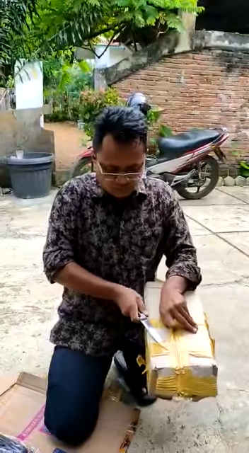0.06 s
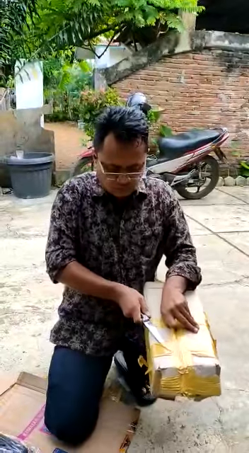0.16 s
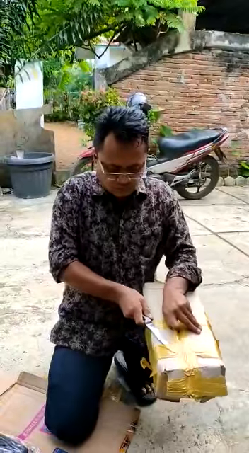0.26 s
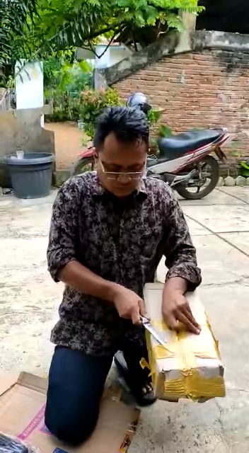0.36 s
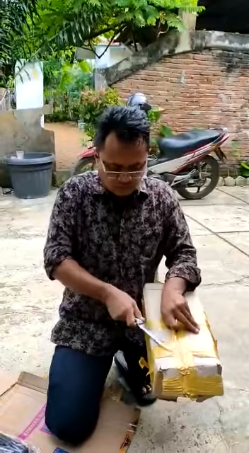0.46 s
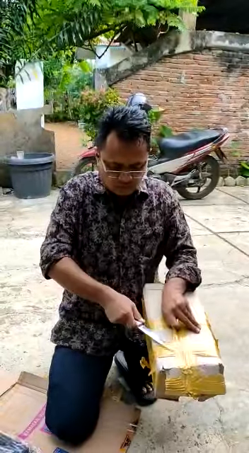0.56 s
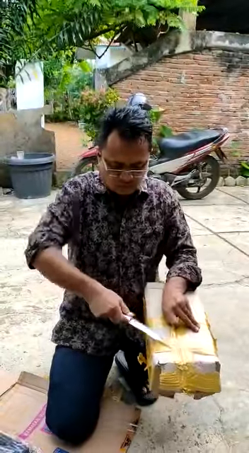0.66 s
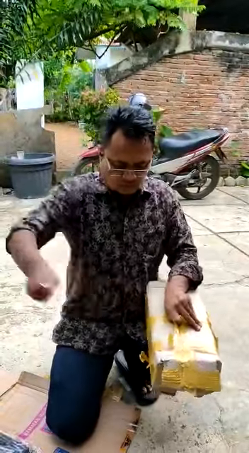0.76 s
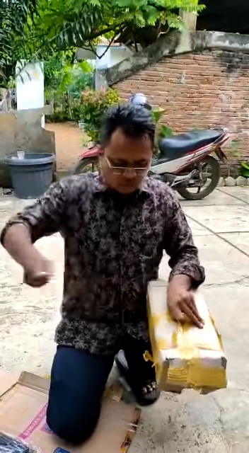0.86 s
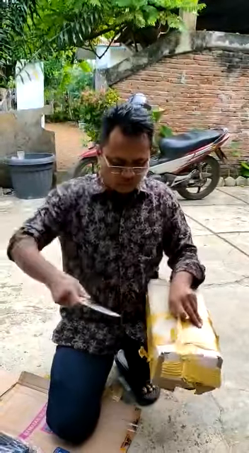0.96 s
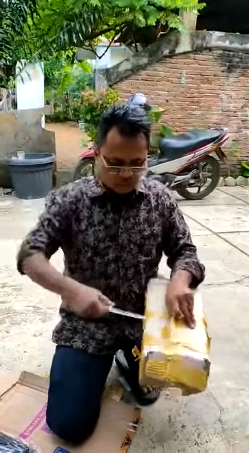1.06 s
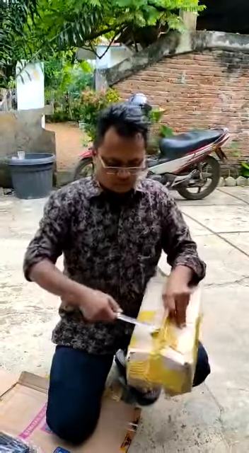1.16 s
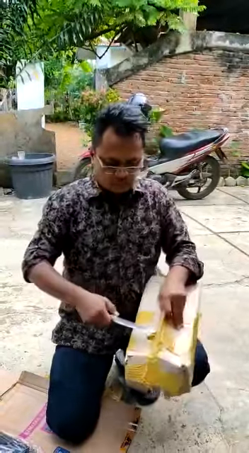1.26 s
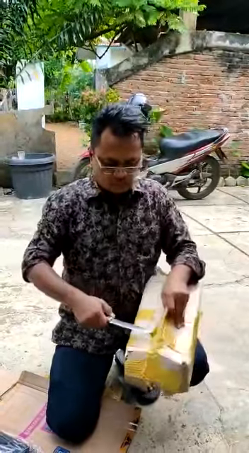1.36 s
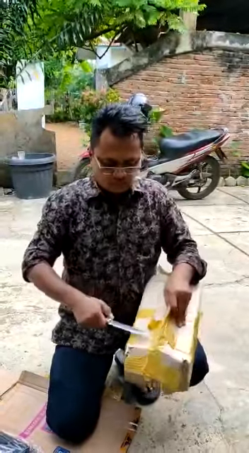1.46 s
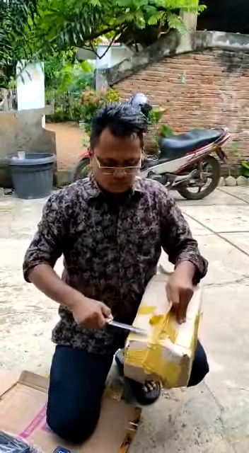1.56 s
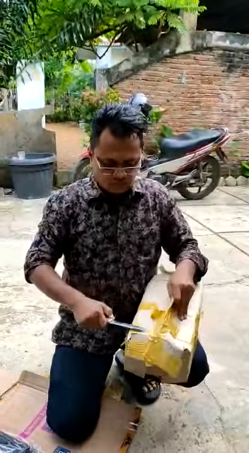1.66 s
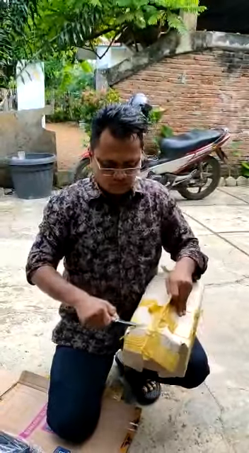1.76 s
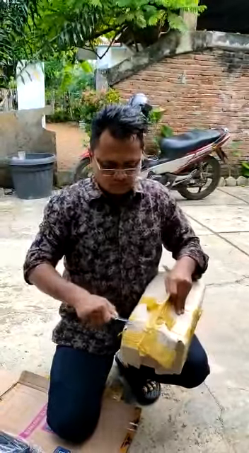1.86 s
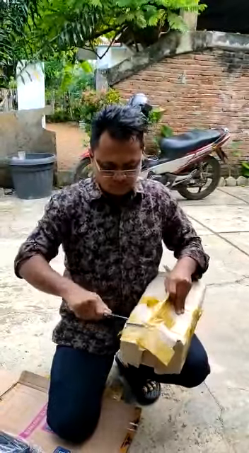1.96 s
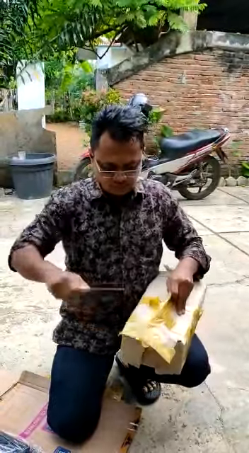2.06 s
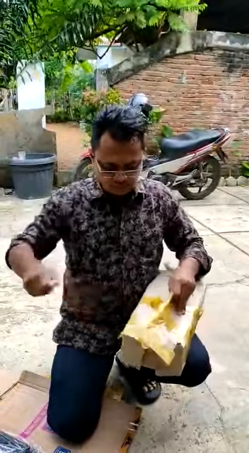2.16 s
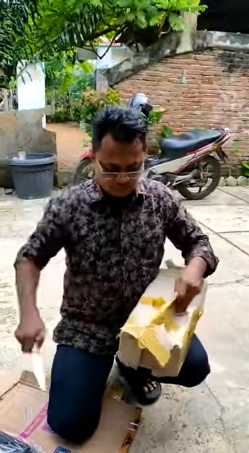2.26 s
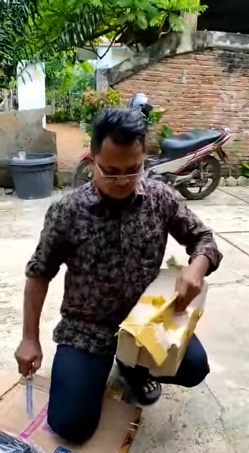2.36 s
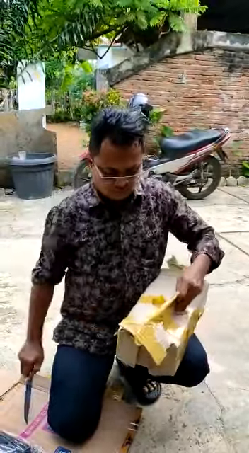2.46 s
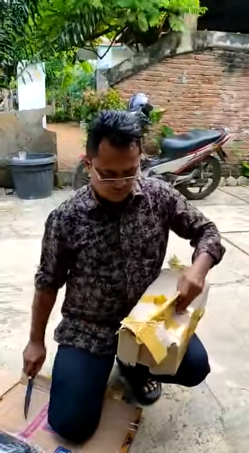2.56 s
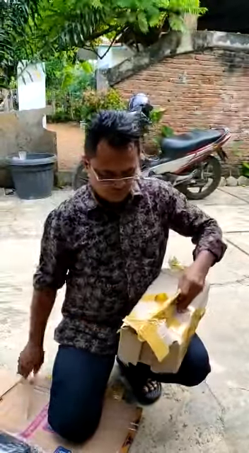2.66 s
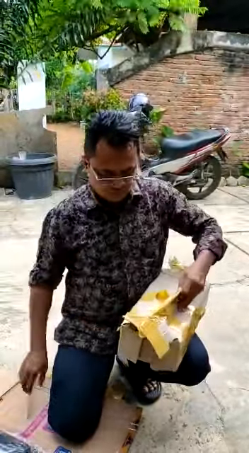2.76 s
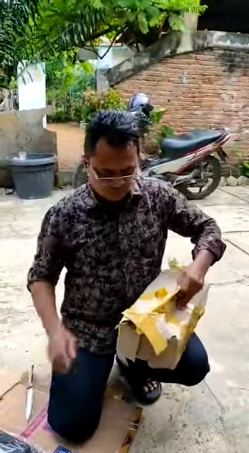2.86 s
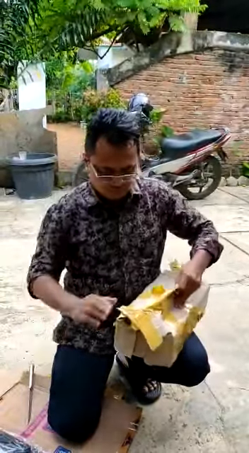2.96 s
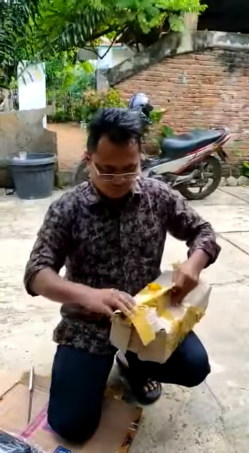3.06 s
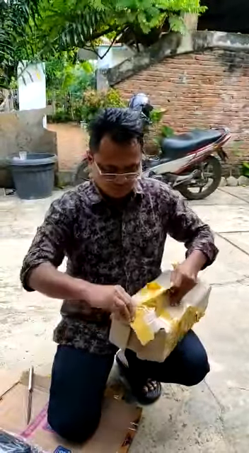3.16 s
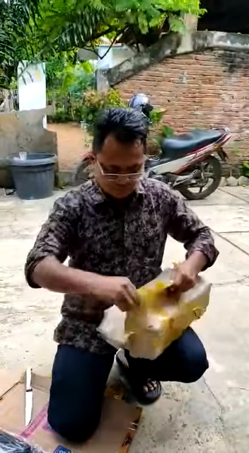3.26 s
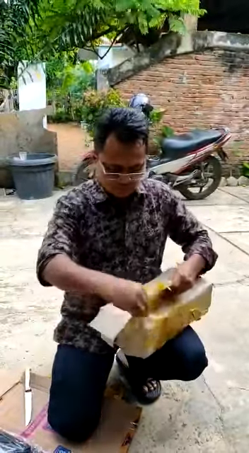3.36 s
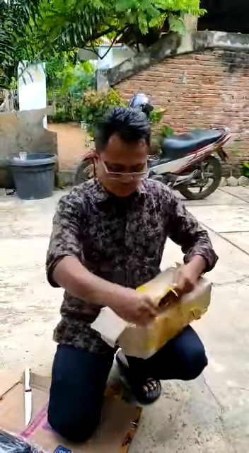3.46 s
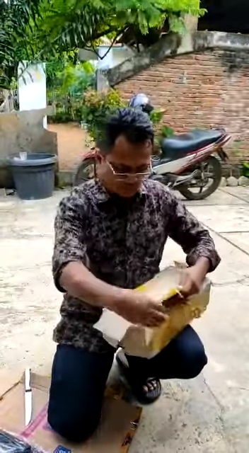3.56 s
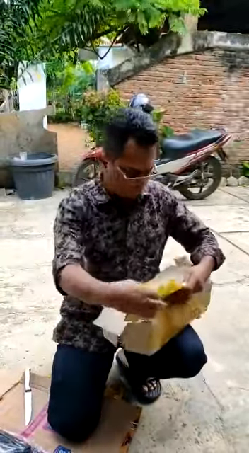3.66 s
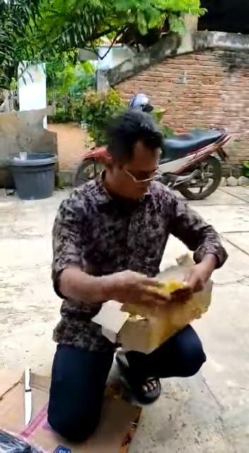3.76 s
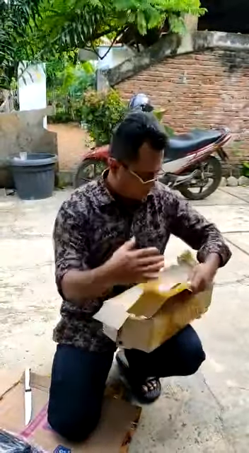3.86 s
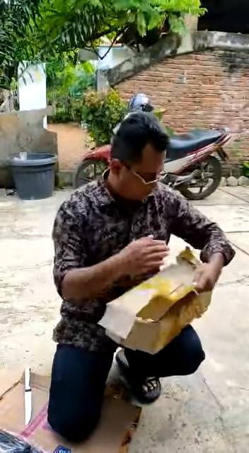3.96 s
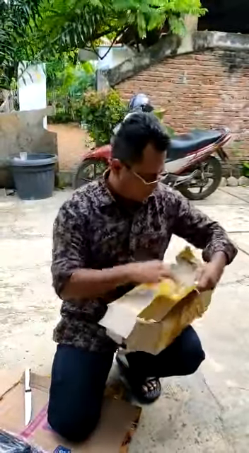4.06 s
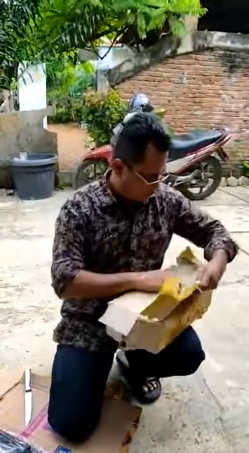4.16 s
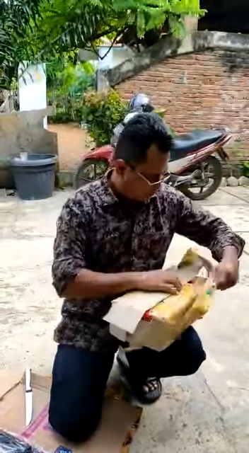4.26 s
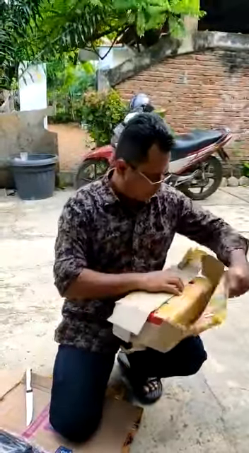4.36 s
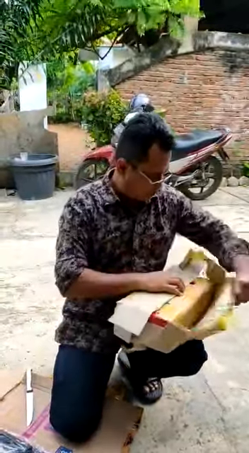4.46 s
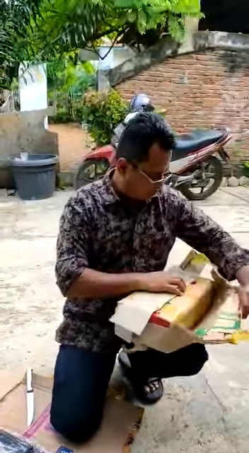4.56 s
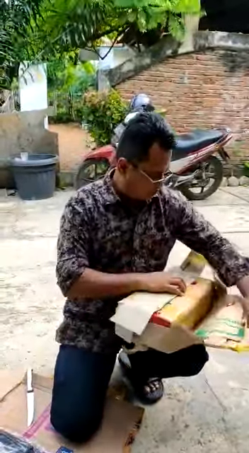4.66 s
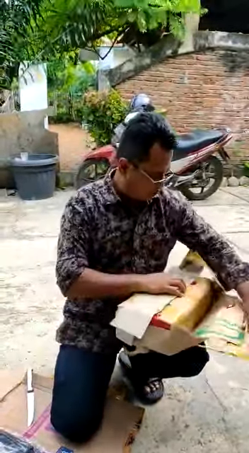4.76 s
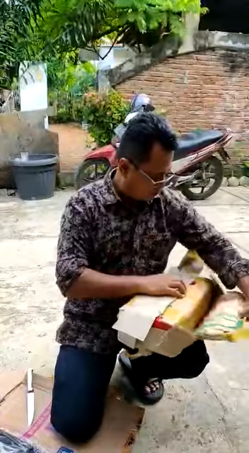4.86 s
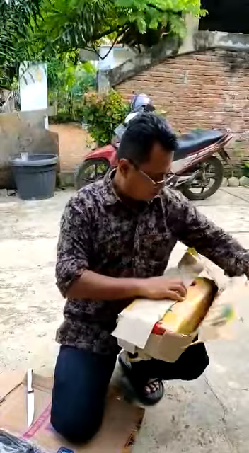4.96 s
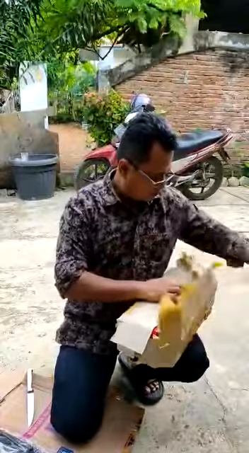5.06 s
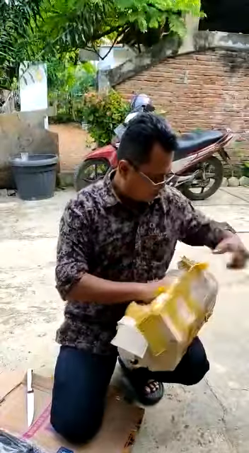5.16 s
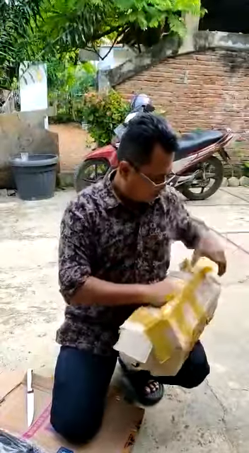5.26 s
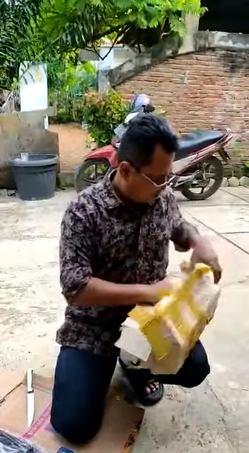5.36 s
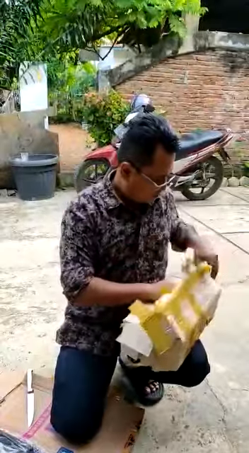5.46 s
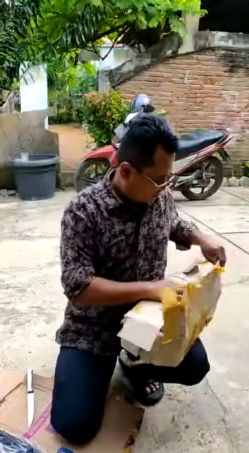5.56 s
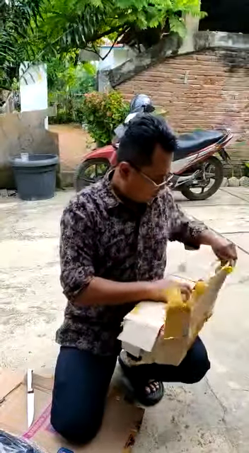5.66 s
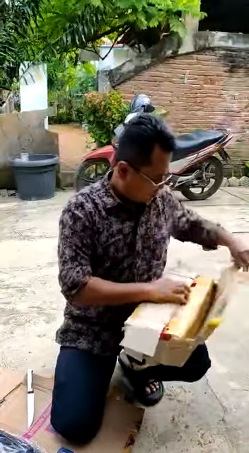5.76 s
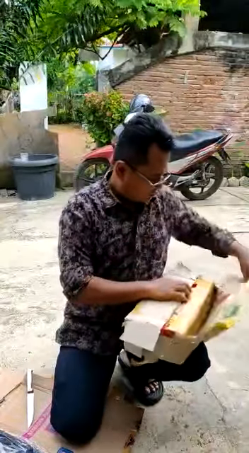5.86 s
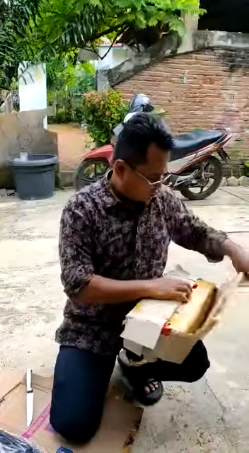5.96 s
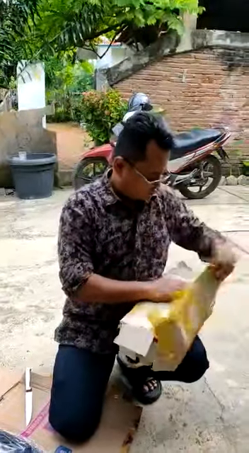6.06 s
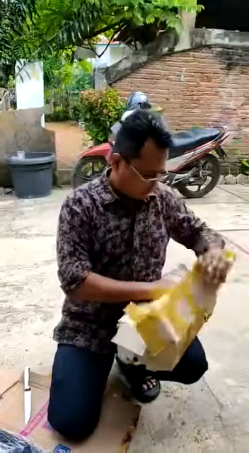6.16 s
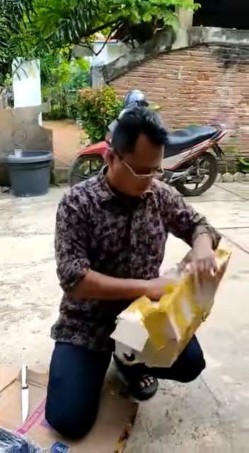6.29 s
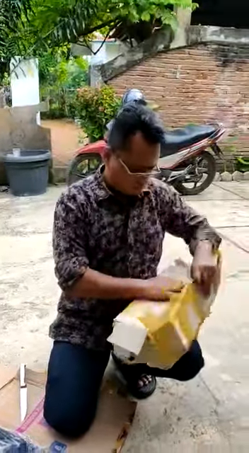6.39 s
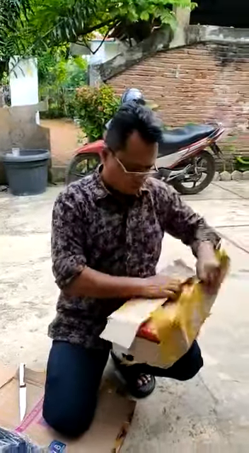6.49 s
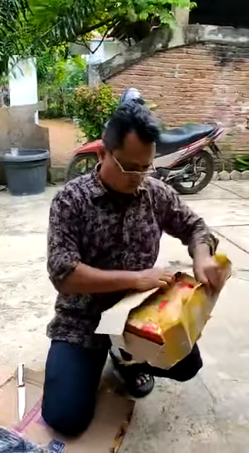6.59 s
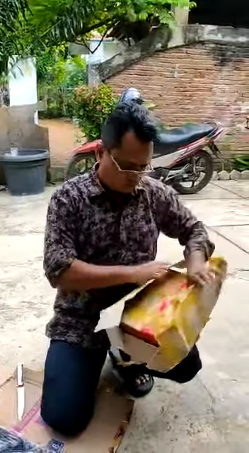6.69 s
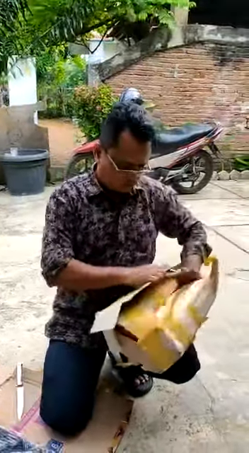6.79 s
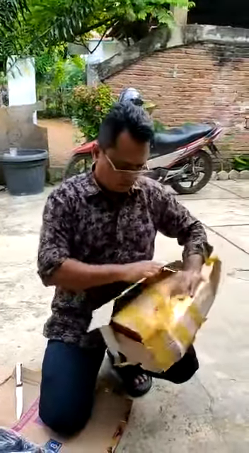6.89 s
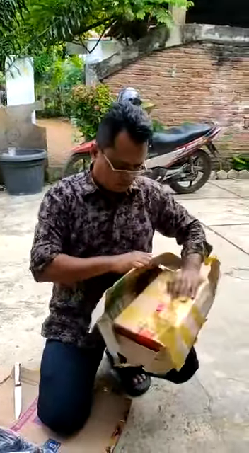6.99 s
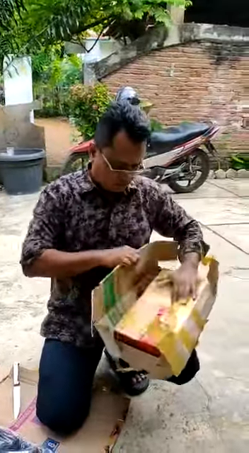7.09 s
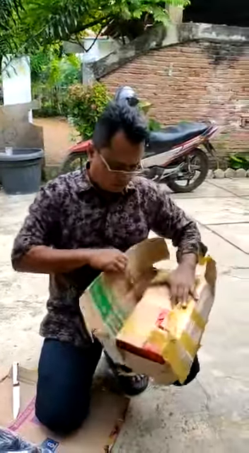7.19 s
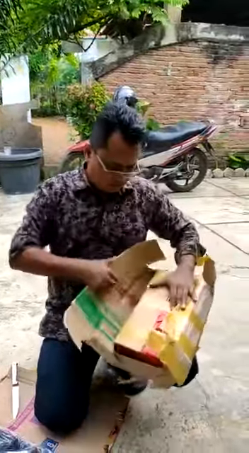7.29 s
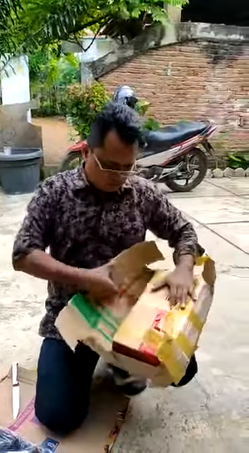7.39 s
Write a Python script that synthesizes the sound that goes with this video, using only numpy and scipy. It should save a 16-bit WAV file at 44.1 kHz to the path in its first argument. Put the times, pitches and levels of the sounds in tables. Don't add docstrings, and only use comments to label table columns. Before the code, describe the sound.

A knife snaps through parcel tape with sharp hollow cracks, then hands tug, rub and crinkle stiff cardboard open in a quiet walled yard.

```python
import sys
import numpy as np
from scipy import signal
from scipy.fft import rfft, irfft, next_fast_len
from scipy.io import wavfile
from scipy.ndimage import uniform_filter1d

SR = 44100
rng = np.random.default_rng(int(sys.argv[2]) if len(sys.argv) > 2 else 0)


def boost_factor(decibels):
    exponent = np.asarray(decibels, float) / 20
    return 10 ** exponent


def generate_wav(signal):
    frames = np.transpose(np.atleast_2d(signal))
    scaled = np.clip(frames, -1, 1) * 32767
    pcm = np.round(scaled).astype(np.int16)
    wavfile.write(sys.argv[1], SR, pcm)


N = 327516
M = next_fast_len(N + SR // 10, True)

# pitch_hz, level_db
AIR_COLOUR = [(12, -34.5), (20, -2), (113, -0.5), (738, -18.5), (1150, -36.5), (1570, -27), (2140, -20),
              (2670, -33.5), (6720, -12), (16000, -7)]
AIR_DB = -62.5
# pitch_hz, level_db
TRAFFIC_COLOUR = [(12, -27.5), (30, -20), (60, -14), (82, 2.5), (97, -11.5), (113, 0), (135, -12.5),
                  (180, -16.5), (230, -29.5), (400, -120)]
# time_s, level_db
ROAD = [
    (0.0, -95.5),
    (2.4, -84.5),
    (2.6, -68.5),
    (3.1, -77),
    (4.2, -83),
    (5.2, -71.5),
    (5.6, -54.5),
    (7.16, -63.5),
    (7.43, -65),
]
# time_s, level_db
JOLTS = [
    (.71, -54),
    (1.17, -69),
    (2.05, -59.5),
    (2.54, -63.5),
    (3.269, -66),
    (4.33, -52.5),
    (4.932, -52),
    (5.229, -56.5),
]
JOLT_RISE_DB_S, JOLT_FALL_DB_S = 291, 114.5

# pitch_hz, time to die by 60 dB_s, level_db
YARD_TAIL = [(184, 0.3, 8), (499, 0.27, 5.5), (1086.5, 0.32, -1), (2500, 0.37, 0), (4400, .34, -1),
             (7370, 0.31, 1), (11500, 0.27, -6)]
# delay_s, level_db
WALL_ECHOES = [
    (.0055, -2),
    (.014, -13),
    (0.022, -18.5),
    (.042, -16),
]

# pitch_hz, level_db per Hz
PLASTIC = [(1940, -39), (3300, -7.5), (4120, -13), (4410, -8), (4780, -8), (6170, -2), (6560, 1.5),
           (7870, -2), (12000, -20.5), (15500, -13.5), (16500, -28.5)]
# pitch_hz, level_db per Hz
FLAP = [(350, -45), (600, -22.5), (791, -4.5), (1110, -1.5), (1240, 1), (1830, -2), (2190, -2.5),
        (2580, -6), (4200, -17.5), (5460, -49.5), (9240, -120)]
# pitch_hz, level_db per Hz
BOX = [(76, -40), (130, -12.5), (324, -10), (360, -1.5), (449, -1), (519, -5), (800, -6.5), (1040, -37.5),
       (1760, -120)]

# start_s, hold_s, plastic_db, flap_db over plastic, box_db over plastic
STROKES = [(0.0, 0.0043, -69.5, -51, -0.5), (0.328, 0.058, -78.5, -17, -4.5), (0.77, 0.046, -55, -6, -2.5),
           (1.1, 0.11, -52, -29, -21), (1.406, 0.18, -65.5, -11, -26.5), (1.715, 0.049, -81, -4, -16.5),
           (1.819, 0.35, -74.5, -6, -19.5), (2.247, 0.28, -64, -15, -21), (2.596, 0.12, -62, 1, -5),
           (2.765, 0.17, -75, -26, -27), (2.92, 0.089, -94, -1.5, 13), (3.12, 0.02, -62, -8.5, -21.5),
           (3.234, 0.051, -52.5, 0, -16), (3.265, 0.038, -55, -18, 0.5), (3.528, 0.034, -52, -15, -42),
           (3.617, 0.031, -52.5, -10, -41), (3.42, 0.025, -65, -24, -21), (3.909, 0.14, -69, 3.5, 2.5),
           (4.07, 0.13, -69, -11, -6), (4.224, 0.028, -54.5, -3, -25), (4.3, 0.022, -47, -1, -4.5),
           (4.451, 0.031, -54, 3, -5), (4.485, 0.024, -54, -10, 2), (4.554, 0.096, -56.5, -8, -6),
           (4.645, 0.041, -47.5, -5.5, -6.5), (4.903, 0.045, -57, -2, -0.5), (5.499, 0.14, -65, -14, -35),
           (5.672, 0.0073, -59, 1.5, -0.5), (5.736, 0.18, -60, -8.5, -36), (5.924, 0.1, -63, -1.5, 3),
           (6.072, 0.095, -59.5, -4.5, -7.5), (6.361, 0.036, -63.5, -16, -26),
           (6.436, 0.041, -58.5, -4.5, -14), (6.485, 0.12, -56, -3, -21), (6.625, 0.073, -60.5, 0, -26),
           (6.727, 0.15, -63, -13.5, -16), (6.86, .05, -78.5, -14, 6), (6.989, 0.043, -50, -2.5, 2),
           (7.126, 0.25, -57.5, -2.5, -9), (7.386, 0.1, -46.5, 9, 1)]
STROKE_RISE_DB_S, STROKE_FALL_DB_S = 346.5, 162
# level_db of plastic, flap, box
REST_DB = [-102, -90.5, -89]
CRINKLES_PER_S, CRINKLE_DB = 220, 14
# start_s, end_s, pitch_hz, level_db
SQUEAKS = [(0.591, 0.629, 1060, -59), (2.712, 2.928, 1082, -66.5), (2.923, 3.0, 880, -68.5),
           (2.928, 3.06, 1125, -77), (1.413, 1.49, 1200, -68), (1.468, 1.557, 3140, -69.5),
           (1.688, 1.799, 5380, -79), (1.698, 1.768, 3430, -80), (3.3, 3.49, 442, -65.5),
           (3.535, 3.607, 3130, -55), (3.575, 3.617, 1260, -63), (6.094, 6.175, 620, -66),
           (6.662, 6.764, 980, -72), (7.247, 7.29, 1330, -45), (3.966, 4.041, 1030, -51),
           (3.966, 4.062, 1280, -55), (3.972, 4.023, 590, -57), (5.384, 5.55, 887, -71),
           (7.254, 7.34, 800, -46)]
SQUEAK_TURNS, STUTTER_DB = 20, 2

# time_s, peak_db, pitch_hz
KNOCKS = [(0.138, -43, 630), (0.325, -53.5, 392), (0.34, -47, 390), (0.403, -50, 424), (0.41, -37.5, 327),
          (0.438, -42, 329), (0.454, -48, 360), (0.48, -48, 316), (0.704, -18, 860), (0.717, -28.5, 384),
          (1.1585, -18.5, 797), (2.048, -23, 806), (2.525, -32.5, 664), (2.589, -23.5, 704),
          (3.834, -29, 900), (4.666, -24.5, 791), (5.845, -35.5, 305), (5.855, -28, 400), (5.884, -49, 400),
          (7.36, -18.5, 890)]
# time_s, peak_db, pitch_hz
THUDS = [(0.712, -33.5, 212), (1.163, -31, 298), (1.712, -59, 238), (2.053, -54.5, 186),
         (2.523, -52.5, 215), (2.592, -42.5, 226), (3.274, -39, 238), (3.836, -42, 302),
         (4.334, -25.5, 273), (4.488, -37, 263), (4.674, -36, 300), (4.896, -37, 304), (5.651, -43.5, 240),
         (6.993, -46, 327)]
# time_s, peak_db, pitch_hz
POPS = [(0.7166, -19, 2290), (0.7228, -32, 670), (1.1127, -33, 1500), (1.1215, -40, 1900),
        (1.1281, -25.5, 1180), (1.151, -30, 1240), (1.459, -62, 1260), (1.482, -47.5, 3250),
        (1.5, -56.5, 3200), (1.544, -64, 2210), (2.237, -49.5, 2250), (2.283, -53, 1040),
        (2.355, -52, 1910), (2.443, -51, 1630), (3.135, -36, 1150), (3.156, -36.5, 2180),
        (3.2225, -33, 2100), (3.2741, -46, 2270), (3.3055, -41, 2370), (3.55, -41, 3170),
        (3.591, -56, 1430), (3.803, -29.5, 1846), (4.317, -27, 1360), (5.655, -46, 1500),
        (6.023, -45, 2300), (6.185, -49.5, 2340), (6.416, -53, 1930), (6.433, -41, 1010),
        (6.506, -40.5, 2380), (6.535, -40, 1620), (6.603, -39, 2160), (6.799, -48.5, 2350),
        (6.895, -49.5, 455), (7.121, -41, 680), (7.238, -34, 1360), (7.24, -39.5, 765), (7.319, -35, 2400)]
KNOCK_TURNS, POP_TURNS = 5.1, 12

# time_s, crackle_peak_db, flap_db, flap_pitch_hz
SNAPS = [(0.0531, -32.5, -67.5, 1194), (0.096, -31, -115, 2270), (0.14, -31, -70, 654),
         (0.195, -35, -99, 720), (0.404, -49.5, -98, 780), (0.444, -49, -92, 840),
         (0.6948, -31, -44.5, 1180), (0.7029, -3.5, -17, 1190), (0.705, -32, -24, 2260),
         (0.9431, -32.5, -41.5, 2205), (0.9879, -35.5, -57.5, 2320), (1.128, -32, -36.5, 1500),
         (1.1602, -21.5, -21.5, 1116), (1.1635, -15.5, -43.5, 1500), (1.1992, -25, -41, 815),
         (1.338, -42.5, -53, 1290), (1.482, -49.5, -61, 2900), (1.965, -28, -39.5, 2590),
         (2.0187, -26.5, -36.5, 1090), (2.022, -14.5, -28, 1170), (2.0492, -15, -19.5, 830),
         (2.2472, -39, -50.5, 2140), (2.2807, -42.5, -53.5, 2070), (2.5268, -40, -46.5, 705),
         (2.588, -83, -54, 813), (2.6428, -39, -41.5, 730)]
# time_s, crackle_peak_db, flap_db, flap_pitch_hz
PULLS = [(3.1566, -36.5, -44.5, 2150), (3.2112, -37.5, -51, 1970), (3.272, -33, -38, 2230),
         (3.4519, -40, -62, 2200), (3.5217, -35.5, -56.5, 2190), (3.7705, -44, -66, 1655),
         (3.8325, -28, -39.5, 1680), (3.878, -38, -45.5, 1810), (4.0818, -49.5, -59, 1180),
         (4.668, -33, -37.5, 930), (4.8841, -25, -36.5, 1190), (4.8899, -28, -28.5, 2700),
         (5.098, -43, -52, 2380), (5.1168, -43, -53.5, 2570), (5.648, -33.5, -40.5, 1410),
         (5.6873, -32.5, -45, 2170), (5.761, -43.5, -58.5, 2820), (5.8518, -69, -41.5, 1274),
         (7.315, -41, -36.5, 790), (7.3592, -26, -26, 1270), (7.37, -27.5, -32, 2240),
         (7.374, -46, -25, 1490), (7.363, -30, -25, 2110), (7.3683, -27, -29, 2050)]
# time_s, crackle_peak_db, flap_db, flap_pitch_hz
TICKS = [(.346, -57, -90, 2500), (1.0502, -43, -62, 2310), (1.0767, -53, -63, 2450),
         (1.534, -50, -56, 2000), (2.485, -48, -57.5, 2170), (2.549, -46, -48, 1890),
         (3.1365, -47, -42, 1970), (3.163, -36, -42.5, 2070), (3.21, -42, -48, 2180),
         (3.293, -33, -50, 2120), (3.3, -46, -54, 2120), (1.5306, -50, -60, 2280), (2.406, -55, -72, 2970),
         (2.516, -50, -59, 2500), (7.2932, -40, -60, 2500), (3.445, -47, -50.5, 2260),
         (3.513, -53, -66, 2880), (3.744, -48, -80, 2130), (4.185, -44, -74, 1220),
         (4.203, -46.5, -56.5, 3160), (4.2387, -35.5, -41.5, 775), (4.29, -38, -58, 1700),
         (4.544, -46, -39.5, 910), (4.6393, -41, -56, 860), (5.185, -53, -61, 2440),
         (5.212, -49, -81, 2600), (5.5177, -63, -59, 2340), (6.077, -41, -53, 2240), (6.35, -62, -69, 3050),
         (6.363, -45, -73, 3120), (6.432, -56, -64, 1110), (6.479, -57, -49, 2300),
         (6.7535, -40, -51, 1980), (6.773, -46, -56, 2150), (6.8425, -44, -59, 3120),
         (6.914, -51, -59, 890), (6.9232, -53, -57, 910), (6.959, -48, -72, 705)]
# top_s, crackle_peak_db, flap_db, flap_pitch_hz, fade_ms
SCUFFS = [(0.473, -55.5, -96, 710, 2.4), (0.6556, -48.5, -53, 1120, 35), (0.7173, -28.5, -21, 738, 1.4),
          (1.1042, -40.5, -44, 1810, 13), (1.146, -27, -32.5, 1320, 1.9), (1.4084, -48, -64, 1820, 8.6),
          (1.5413, -50.5, -67, 3125, 15), (1.9435, -41, -41, 750, 12), (2.002, -33.5, -42, 1230, 7.8),
          (2.014, -28, -49, 1300, 3.7), (.676, -42.5, -53.5, 3280, 5.7), (3.395, -45, -52, 2080, 10.4),
          (2.783, -50.5, -57, 2070, 3.1), (2.939, -67, -74, 891, 5.8), (3.5847, -45, -48.5, 1360, 46),
          (3.661, -41.5, -51, 1410, 5.5), (3.991, -65, -90, 1080, 40), (4.3215, -22.5, -31.5, 1280, 6.8),
          (4.333, -27, -33, 1000, 2.2), (4.594, -42.5, -43.5, 765, 93), (5.1776, -50.5, -71.5, 2420, 21),
          (5.4052, -53, -73.5, 897, 3.4), (5.5393, -40.5, -54, 2330, 69), (5.901, -41.5, -49, 1080, 86),
          (6.1876, -44, -49, 1540, 25), (6.2167, -41.5, -54, 2110, 9.6), (6.977, -42, -34.5, 766, 2.6),
          (7.294, -40.5, -35.5, 900, 23)]
# top_s, crackle_peak_db, flap_db, flap_pitch_hz
PEELS = [(1.117, -41, -40.5, 1720), (1.816, -57, -65, 2100), (2.408, -49.5, -61.5, 2122),
         (3.131, -41, -46, 1111), (3.2279, -35.5, -44.5, 2780), (3.8048, -37.5, -42, 1760),
         (4.485, -34.5, -42, 902), (6.0137, -44, -54, 2170), (6.093, -43.5, -54.5, 2300),
         (6.4316, -52, -47, 910), (6.9909, -38, -32.5, 930), (7.11, -44.5, -46.5, 950),
         (7.257, -39, -40, 1260)]
SNAP_SWELL_MS, SNAP_FADE_MS, PULL_SWELL_MS = 0.51, 2.8, 0.62
TICK_SWELL_MS, TICK_FADE_MS = 0.12, 0.84
PEEL_SWELL_MS, PEEL_FADE_MS = 6.4, 20
SCUFF_SWELL_SHARE = 0.55
SMALL_FLAP_DB = -9.5
SMALL_BOX_DB = -9
THIN_FILM_DB = 10.5

# pitch_hz, left_minus_right_db
PORT_DB = [(90, 3), (350, 6.5), (700, -2), (1400, 2), (2800, 10), (5600, 16), (7600, 11), (9500, -16),
           (11500, 11.5), (14000, 6.5)]
# pitch_hz, left_lead_rad
PORT_RAD = [(0, 0), (690, 0.2), (1550, 1.8), (2500, -0.0), (3190, -5.0), (3790, -4.0), (7240, -3.5),
            (9040, 6.3), (14400, 6.7), (15100, 9.1)]
# pitch_hz, likeness from 0 to 1
ALIKE = [(25, .4), (60, 0.8), (130, .97), (300, 0.94), (700, 0.3), (1400, 0), (3000, .05)]
# time_s, extra left_minus_right_db
TURN = [(0, 0.5), (.7, -0.5), (1.1, -.5), (1.6, 0), (2.1, 1.5), (3, -.3), (3.699, 1), (4.2, -1.5),
        (4.701, -1), (5.199, -0.5), (6.201, 1.2), (6.8, -1), (7.43, -1.5)]
# pitch_hz, level_db per bin
HUSH = [(100, -112), (2000, -104), (4000, -99), (12000, -108.5)]
# pitch_hz, level_db over neighbours
MASKED = [(1200, -40), (2000, -9), (2600, -2.6), (4700, -2.4), (5400, -6), (8600, -6), (9800, -1.6),
          (16000, -1.2)]


def unit(x):
    return x / np.sqrt(np.mean(x ** 2))


def read(table, count):
    hz, value = np.transpose(table)
    return np.interp(np.log(np.fft.rfftfreq(count, 1 / SR) + 1), np.log(hz + 1), value)


def colour(x, spectrum):
    return irfft(rfft(x) * boost_factor(read(spectrum, x.shape[-1])), x.shape[-1])


def scattered(pair):
    likeness = np.clip(read(ALIKE, pair.shape[-1]), 0, 1)
    mid, side = rfft(pair) * np.sqrt([(1 + likeness) / 2, (1 - likeness) / 2])
    return irfft(np.array([mid + side, mid - side]), pair.shape[-1])


def ports(x):
    half = boost_factor(read(PORT_DB, M) / 2) * np.exp(0.5j * read(PORT_RAD, M))
    return irfft(rfft(x) * np.array([half, 1 / half]), M)


def walk(rate):
    held = int(SR / rate)
    steps = np.repeat(rng.standard_normal(M // held + 1), held)
    return uniform_filter1d(steps, held)[:M]


def swells(start, hold, db, rise_db_s, fall_db_s, rest):
    t = np.arange(0, M / SR, 1 / 500)
    start, end, db = start[:, None], (start + np.abs(hold))[:, None], db[:, None]
    rising = rise_db_s * np.clip(start - t, 0, None)
    falling = fall_db_s * np.clip(t - end, 0, None)
    rest_db = np.interp(t, *np.transpose(rest))
    power = np.sum(boost_factor(db - rising - falling) ** 2, axis=0) + boost_factor(rest_db) ** 2
    return np.interp(np.arange(M) / SR, t, 10 * np.log10(power))


def ring(x, hz, t60):
    r = np.exp(-np.log(1000) / (t60 * SR))
    return signal.lfilter([1, 0, -1], [1, -2 * r * np.cos(2 * np.pi * hz / SR), r * r], x)


def add(out, s, x, db):
    i = int(s * SR)
    out[i:i + len(x)] += (x * boost_factor(db) / np.abs(x).max())[:M - i]


def still_air():
    air = unit(colour(scattered(rng.standard_normal((2, M))), AIR_COLOUR))
    air = colour(air, [(3000, 2.0), (5000, -5.5), (8500, -5.5), (10000, -11.0)])
    return air * boost_factor(AIR_DB - 5.0 + 1.2 * walk(2.4))


def traffic_and_jolts():
    s, db = np.transpose(JOLTS)
    level_db = swells(s, 0 * s, db, JOLT_RISE_DB_S, JOLT_FALL_DB_S, ROAD)
    hum = unit(colour(scattered(rng.standard_normal((2, M))), TRAFFIC_COLOUR))
    return hum * boost_factor(level_db - 2.0)


def yard(x):
    t = np.arange(SR) / SR
    tail, hiss = 0, 0
    noise = colour(scattered(rng.standard_normal((2, M))), [(8500, -0.5), (12000, -9.5)])
    for hz, t60, db in YARD_TAIL:
        edges = [hz / 1.593, hz * 1.327] if hz < 2000 else [hz / 1.3, hz * 1.3]
        band = signal.butter(2, edges, "band", fs=SR, output="sos")
        share = 2 * np.log(1000) / t60 / SR
        if hz < 2000:
            tail = tail + signal.sosfilt(band, noise[:, :SR]) * boost_factor(db - 60 * t / t60) * np.sqrt(share)
        else:
            energy = uniform_filter1d(signal.sosfilt(band, x) ** 2, size=200)
            energy = signal.lfilter([share], [1, share - 1], energy)
            level = np.sqrt(np.abs(np.roll(energy, 200)))
            hiss = hiss + unit(signal.sosfilt(band, noise)) * boost_factor(db) * level
    tail = tail * np.clip(t / 0.0034, 0, 1)
    echoes = sum(boost_factor(db) * np.roll(x, int(s * SR)) for s, db in WALL_ECHOES)
    smear = scattered(rng.standard_normal((2, 640)) * np.exp(-np.arange(640) / 250.0))
    low_tail = signal.fftconvolve(x[None], tail)[:, :M]
    return hiss + low_tail + signal.fftconvolve(echoes[None], smear / 19.0)[:, :M]


def rub(spectrum, db, grain_db, grip, patchy_db):
    sizes_db = grain_db * np.minimum(rng.exponential(size=M), 6.5)
    slips = unit(rng.standard_normal((2, M)) * boost_factor(sizes_db))
    creases = (rng.random(M) < CRINKLES_PER_S / SR) * rng.standard_normal((2, M))
    slips = slips + creases * boost_factor(CRINKLE_DB)
    bins = rfft(unit(colour(slips, spectrum)))
    octave = np.log2(np.fft.rfftfreq(M, 1 / SR) + 1)
    low, top = np.log2(spectrum[1][0]), np.log2(spectrum[-2][0])
    place = np.clip((octave - low) / (top - low), 0, 1) * 4
    body = 0
    for k in range(5):
        part = irfft(bins * np.clip(1 - abs(place - k), 0, 1), M)
        body = body + part * boost_factor(patchy_db * walk(14))
    body = body * boost_factor(db + grip)
    return body[0], scattered(np.roll(body, 300, axis=1))


def rubbing():
    s, hold, db, flap, box = np.transpose(STROKES)
    plastic_db, flap_db, box_db = (
        swells(s, hold, db + share, STROKE_RISE_DB_S, STROKE_FALL_DB_S, [(0, rest)])
        for share, rest in zip((0, flap, box), REST_DB))
    grip = 1.3 * walk(30)
    near, far = 0, 0
    for straight, spread in (rub(PLASTIC, plastic_db + 0.068, 3.0, grip + 2.2 * walk(90), 2.0),
                             rub(FLAP, flap_db + 0.18, 3.0, grip + 2.2 * walk(60), 3.8),
                             rub(BOX, box_db + 0.055, 2.8, 0.53 * grip + 2.0 * walk(25), 2.8)):
        near, far = near + 0.77 * straight, far + 0.49 * spread
    return near, far


def squeaks():
    out, stutter = np.zeros(M), boost_factor(STUTTER_DB * walk(45))
    for start, end, hz, db in SQUEAKS:
        slips = rng.standard_normal(SR // 2)[:int((end - start) * SR)]
        tone = ring(ring(slips, hz, SQUEAK_TURNS / hz), hz, 14 / hz)
        add(out, start, tone * np.hanning(len(slips)) ** 0.23, db + 6.5)
    return out * stutter


def knocks():
    out, t = np.zeros(M), np.arange(4096) / SR
    rows = [(*row, KNOCK_TURNS) for row in list(KNOCKS) + list(THUDS)]
    rows += [(*row, POP_TURNS) for row in POPS]
    for s, db, hz, turns in rows:
        cycles = t * hz
        push = rng.standard_normal(len(t)) * cycles * np.exp(-cycles / 0.45)
        push = ring(ring(push, 1.01 * hz, 2.1 / hz), hz, 2.5 / hz)
        main = unit(ring(push, hz, turns / hz))
        upper = unit(ring(push, 1.6 * hz, 3.0 / hz))
        add(out, s - 0.35 / hz, main + 0.095 * upper, db - 3.5)
    return out


def tears():
    out, lead = np.zeros(M), 2048
    ms = (np.arange(4096) - lead) * 1000 / SR
    # swell_ms, fade_ms, height of the crack
    rows = [(*row, SNAP_SWELL_MS, SNAP_FADE_MS, 24.0) for row in SNAPS]
    rows += [(*row, PULL_SWELL_MS, 2.1 * SNAP_FADE_MS, 4.0) for row in PULLS]
    rows += [(*row, TICK_SWELL_MS, TICK_FADE_MS, 7.0) for row in TICKS]
    rows += [(*row[:-1], SCUFF_SWELL_SHARE * row[-1], row[-1], 0.5) for row in SCUFFS]
    rows += [(*row, PEEL_SWELL_MS, PEEL_FADE_MS, 0.5) for row in PEELS]
    for s, crackle_db, flap_db, flap_hz, swell_ms, fade_ms, crack in rows:
        noise, size = rng.standard_normal(len(ms)), rng.exponential(size=len(ms))
        envelope = np.exp(-abs(ms) / np.where(ms < 0, swell_ms, fade_ms))
        ticks = noise * boost_factor(4.65 * np.minimum(size, 4.2)) * envelope
        ticks = ticks * np.hanning(len(ms)) ** 0.5
        ticks[lead] = crack
        start = s - lead / SR

        top_db = THIN_FILM_DB * np.clip((crackle_db - flap_db) / 35, -0.3, 1)
        crackle = colour(colour(ticks, PLASTIC), [(8500, 0.0069), (11500, top_db)])
        add(out, start, crackle, crackle_db + 2.0)

        flap = colour(colour(ticks, FLAP), [(flap_hz / 2, SMALL_FLAP_DB), (0.77 * flap_hz, 0)])
        flap_ring = ring(ring(ticks, flap_hz, 0.008), flap_hz, 0.0012)
        add(out, start, unit(flap) + 0.4 * unit(flap_ring), flap_db + 3.0)

        box_db = flap_db - 10.5 + SMALL_BOX_DB * np.log2(flap_hz / 800)
        add(out, start, colour(ticks, BOX), box_db)
    return out


def scene():
    hits = tears() + knocks()
    rub_near, rub_far = rubbing()
    near = squeaks() + rub_near
    far = yard(hits) + rub_far
    turn_db = np.interp(np.arange(M) / SR, *np.transpose(TURN))
    direct = ports(colour(hits, [(9000, 0), (12500, 0.35)]) + near)
    parcel = (direct + far) * boost_factor(np.array([turn_db, -turn_db]) / 2)
    return (parcel + traffic_and_jolts() + still_air())[:, :N]


def roll_off(x):
    return signal.sosfilt(signal.butter(12, 17160, fs=SR, output="sos"), x)


def record(dry):
    frames = signal.stft(dry, nperseg=1024)[2]
    power = np.mean(abs(frames) ** 2, axis=0)
    smooth = uniform_filter1d(uniform_filter1d(power, size=4, axis=0), size=2, axis=1)
    hush = boost_factor(2 * read(HUSH, 1024))[:, None]
    keep = np.clip(1 - hush / (smooth + 1e-18), boost_factor(-6.0), 1)
    cells = uniform_filter1d(uniform_filter1d(power, size=5, axis=0), size=3, axis=1)
    neighbours = uniform_filter1d(cells, size=31, axis=0)
    heard = cells > neighbours * boost_factor(2 * read(MASKED, 1024))[:, None]
    total = power.sum(axis=0)
    heard = heard | (total > 2.5 * uniform_filter1d(total, size=15))
    rows = np.arange(len(power)) // 5 * 5
    columns = np.arange(power.shape[1]) // 3 * 3
    clean = signal.istft(frames * keep * heard[rows][:, columns], nperseg=1024)[1][:, :N]
    clean = signal.sosfilt(signal.ellip(8, 0.3, 60, 16450, fs=SR, output="sos"), clean)
    return roll_off(clean)


dry = scene()
out = record(dry)
generate_wav(out)
```